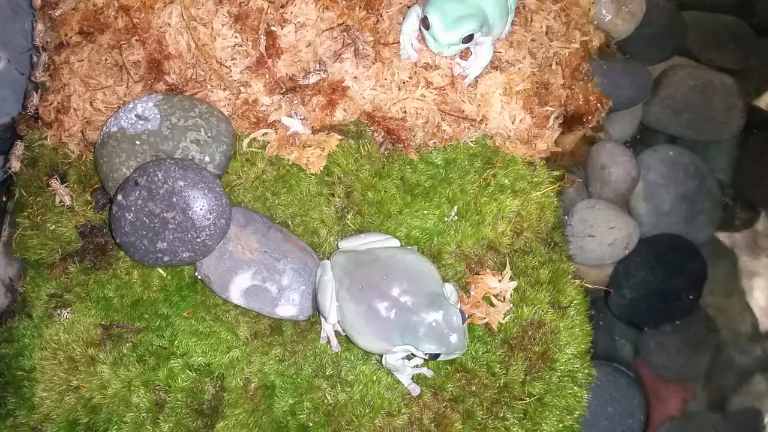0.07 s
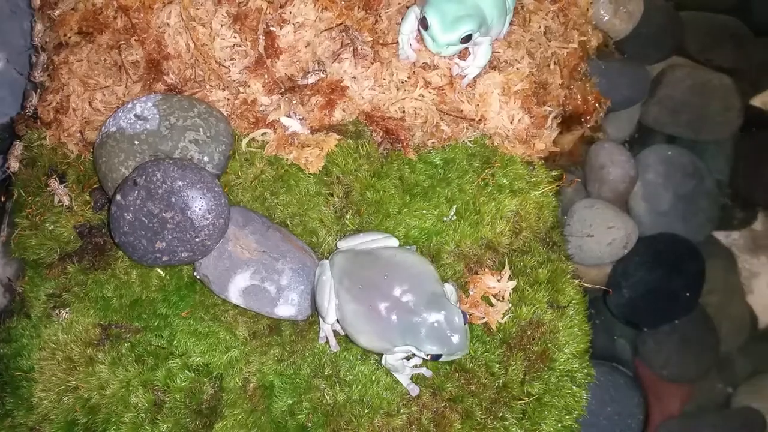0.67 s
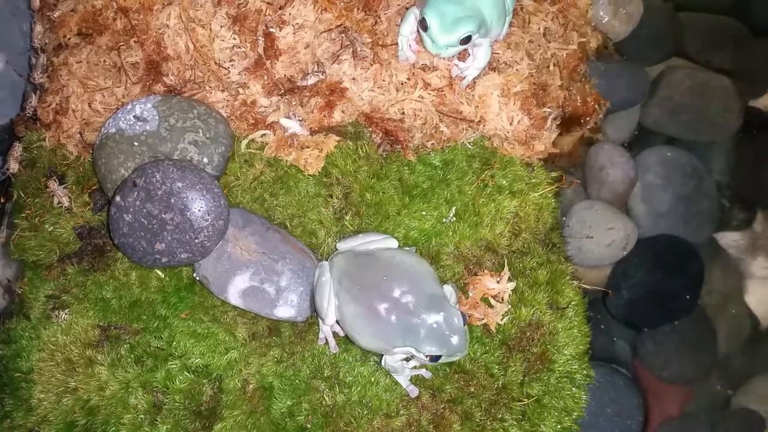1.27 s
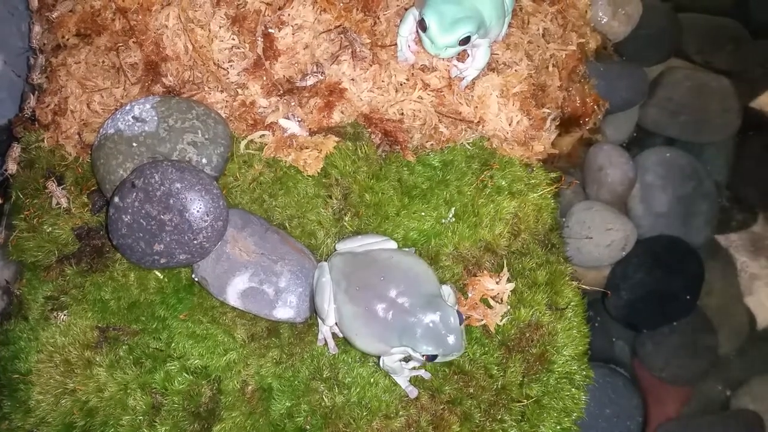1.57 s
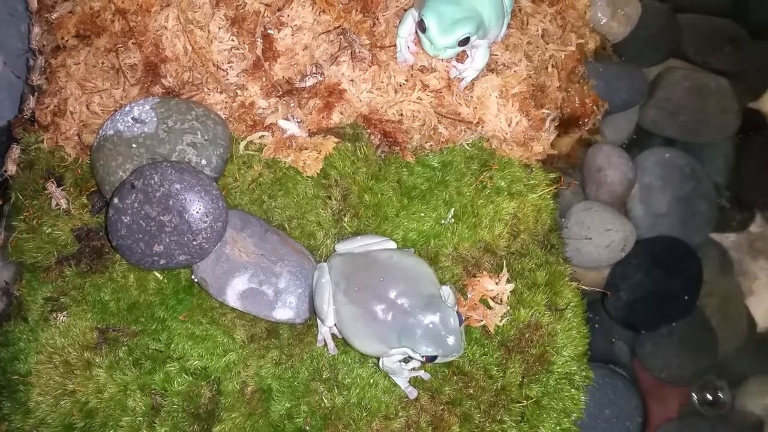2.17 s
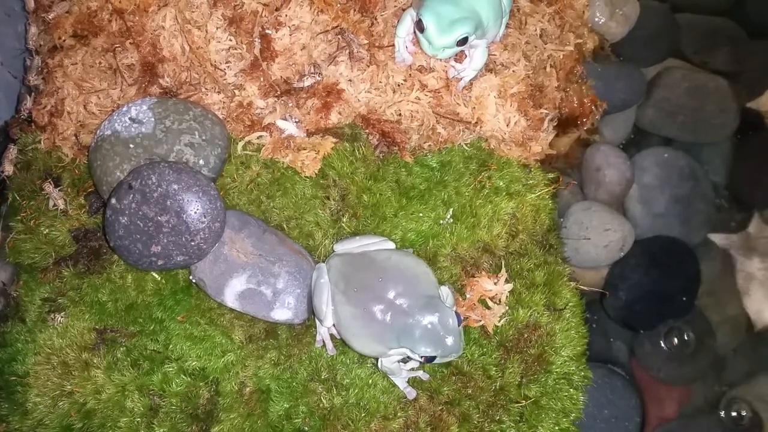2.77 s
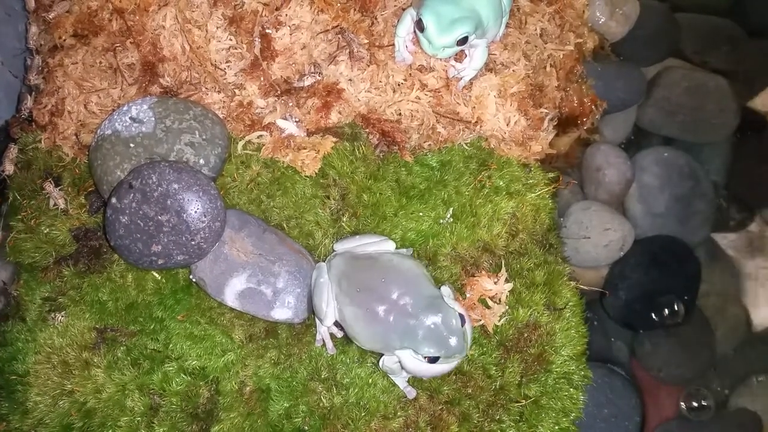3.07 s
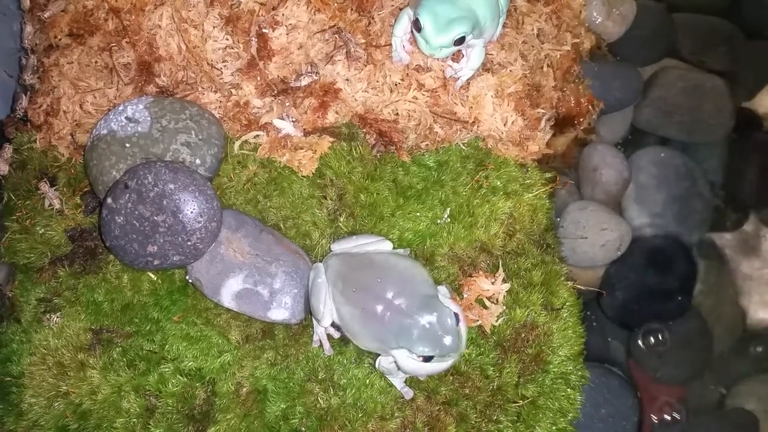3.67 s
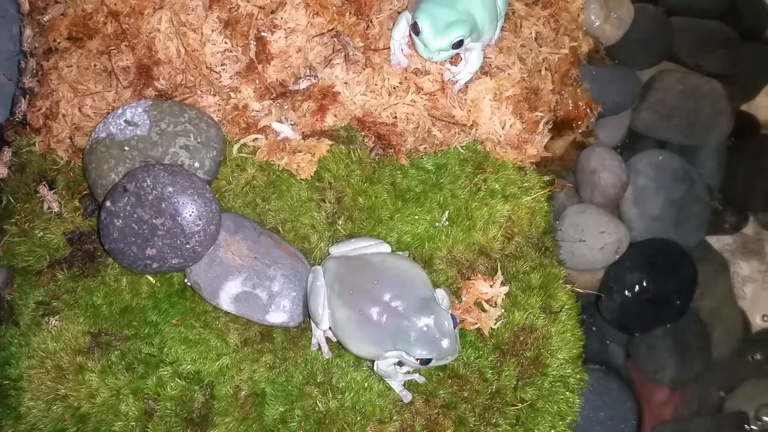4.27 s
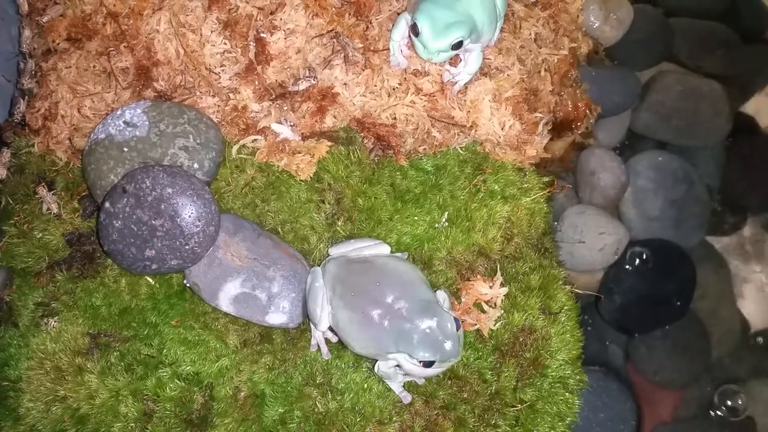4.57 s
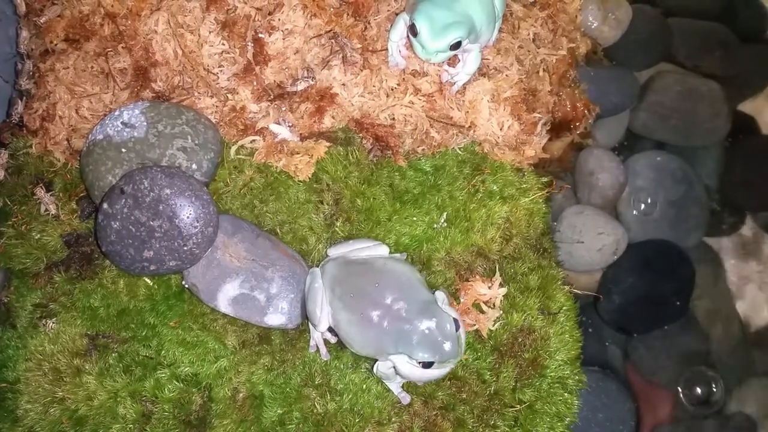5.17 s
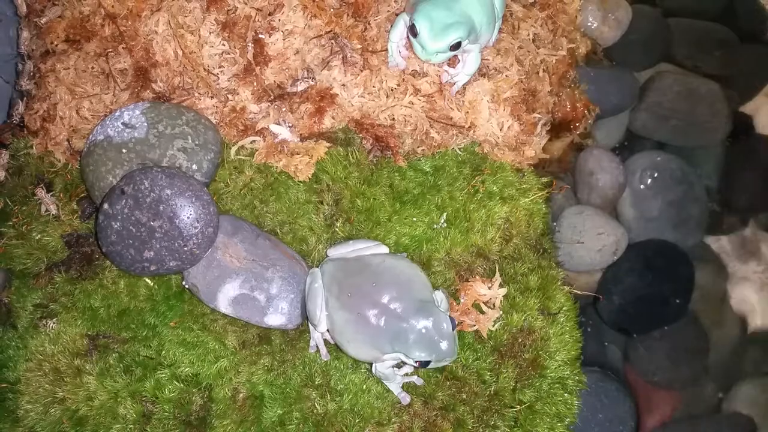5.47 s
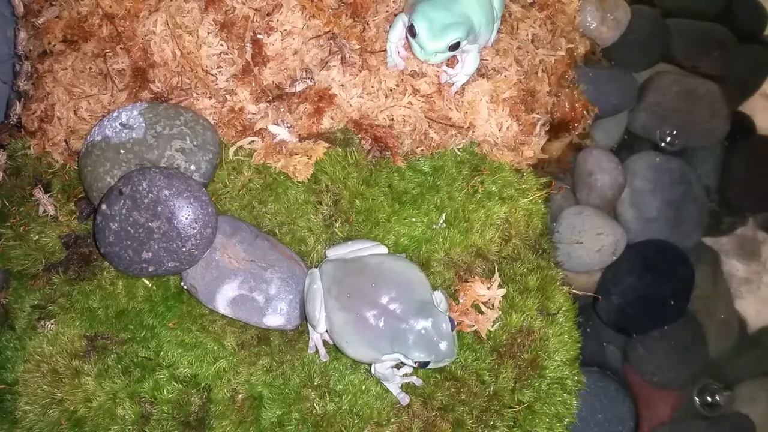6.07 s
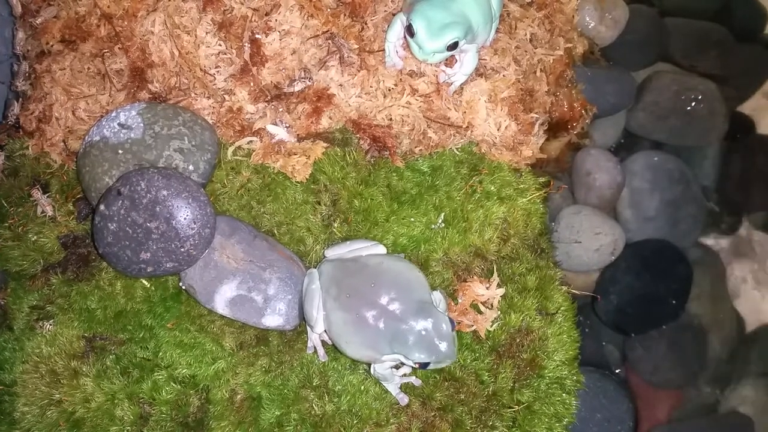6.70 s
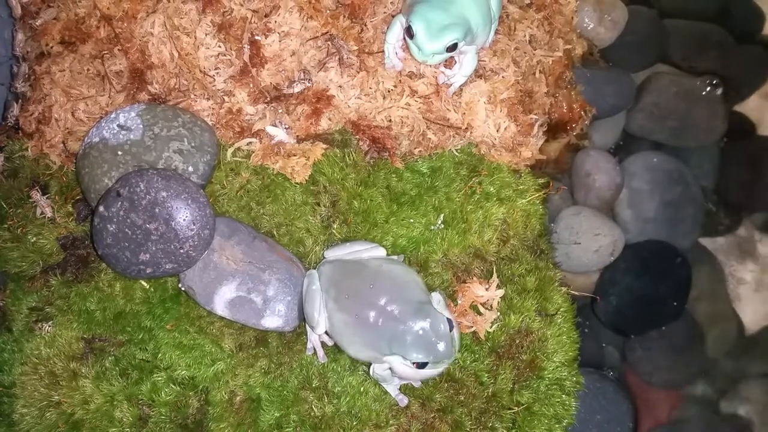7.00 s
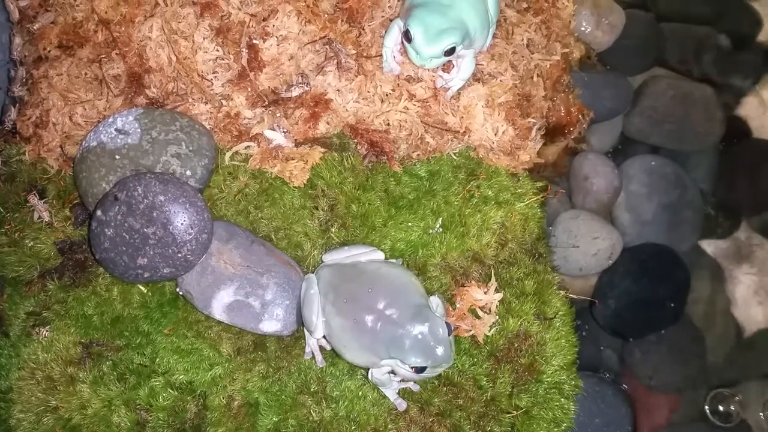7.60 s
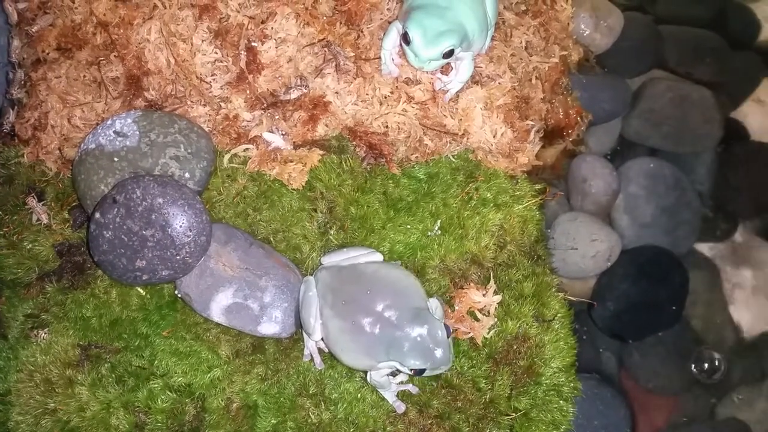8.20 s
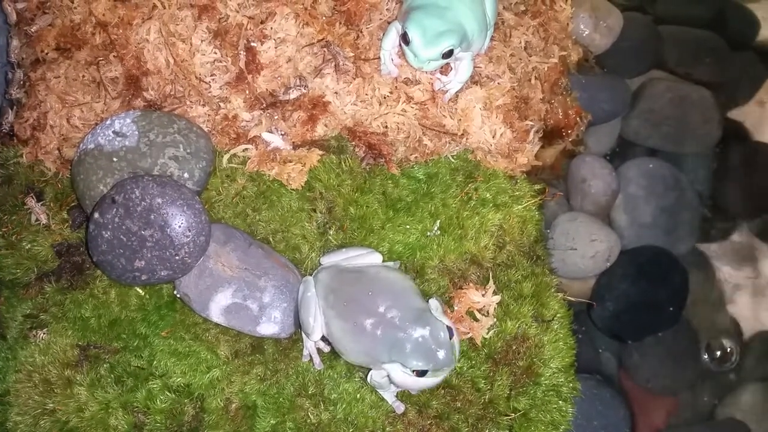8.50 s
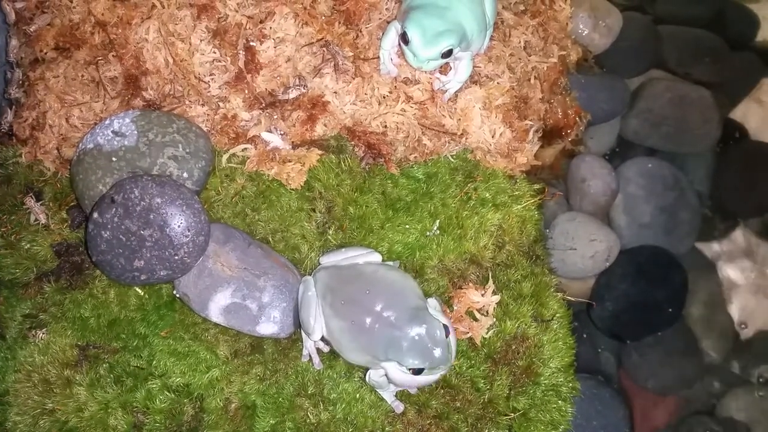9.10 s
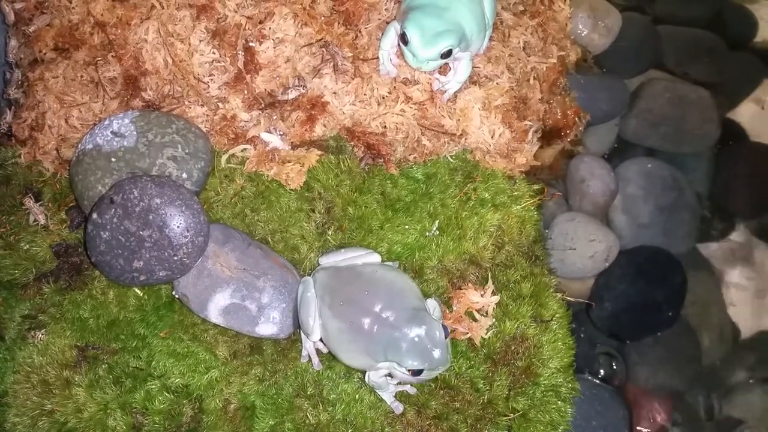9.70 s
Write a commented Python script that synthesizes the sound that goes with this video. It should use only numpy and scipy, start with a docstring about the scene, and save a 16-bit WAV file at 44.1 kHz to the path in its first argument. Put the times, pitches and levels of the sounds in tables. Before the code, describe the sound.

A tree frog barks short, harsh croaks about twice a second, over faint trickling water and a low pump hum.

```python
"""A glass tank in a small room, a stereo microphone close to a tree frog that barks about twice a second.
Each croak is a run of larynx pulses through the throat sac, echoed by the glass and the room.
Behind it water trickles over pebbles, a little to the right, in ticking drops and ringing bubbles,
and a pump hums. The sound fades in during the first croak."""
import sys
import numpy as np
from scipy import signal
from scipy.fft import rfft, irfft, next_fast_len
from scipy.io import wavfile
from scipy.ndimage import uniform_filter1d, minimum_filter1d, map_coordinates

SR = 44100
rng = np.random.default_rng(int(sys.argv[2]) if len(sys.argv) > 2 else 0)


def master(y):
    """Save y as 16-bit WAV."""
    cut = np.clip(np.atleast_2d(y).T, -1, 1)
    pcm = np.round(cut * 32767)  # scale
    wavfile.write(sys.argv[1], SR, pcm.astype(np.int16))


N = 434385
TIME = np.arange(N) / SR
LEAD_IN_S, RUN_OUT_S = 0.0443, 0.019  # the lungs push before a croak's start and after its end
# Reverberation between the glass walls. Each row: frequency in Hz, seconds to die by 60 dB.
GLASS_DECAY = [(500, 0.21), (2000, 0.07), (6000, 0.028), (14000, 0.0098)]


def amp(db):
    """Decibels to gain."""
    return 10 ** (np.asarray(db) / 20)


def unit(x):
    """x at rms 1."""
    return x / np.sqrt(np.mean(x ** 2) + 1e-20)


def along(points, hz):
    """Interpolate (Hz, value) points on a log frequency axis."""
    f, v = np.transpose(points)
    return np.interp(np.log(hz + 1), np.log(f + 1), v)


def step(x, centre, span):
    """A smooth rise from 0 to 1."""
    return .5 + .5 * np.tanh((x - centre) / (2 * span))


def bump(x, centre, span):
    """A smooth hill of height 1."""
    return np.exp(-((x - centre) / span) ** 2)


def peak(hz, centre, width):
    """A resonance of height 1, halved at width Hz from its centre."""
    return 1 / (1 + ((hz - centre) / width) ** 2)


def wobble(rate):
    """A smooth random curve, rate knots a second."""
    return map_coordinates(rng.standard_normal(int(N * rate / SR) + 4), [TIME * rate])


def add(track, s, sound):
    """Mix a sound into a track from time s."""
    start = int(np.clip(round(s * SR), 0, N - 1))
    track[..., start:start + sound.shape[-1]] += sound[..., :N - start]


def filtered(x, response):
    """x through a filter given as a function of Hz."""
    size = next_fast_len(N + SR // 2)
    return irfft(rfft(x, size) * response(np.fft.rfftfreq(size, 1 / SR)), size)[..., :N]


def causal(gain):
    """The minimum-phase response with this gain: it rings only after the blow."""
    cepstrum = irfft(np.log(np.maximum(gain, 1e-6)))
    half = cepstrum.shape[-1] // 2
    cepstrum[..., 1:half] *= 2
    cepstrum[..., half + 1:] = 0
    return np.exp(rfft(cepstrum))


def reverb(x, decays):
    """A diffuse tail for each side; every frequency dies at its own speed."""
    hz, t, noise = signal.stft(rng.standard_normal((2, SR // 2)), SR, nperseg=256)
    tail = signal.istft(noise * amp(-60 * t / along(decays, hz)[:, None]), SR, nperseg=256)[1]
    tail /= np.sqrt(np.sum(tail ** 2, axis=1, keepdims=True))
    return signal.fftconvolve(np.atleast_2d(x), tail, axes=1)[:, :N]


def tank(x):
    """The air between the panes rings at a few modes."""
    # Each row: mode in Hz, width in Hz, left and right gain in dB.
    modes = [(728, 18, 7.5, -2), (917.6, 40, 11, 10.5), (1487, 51, -0.5, -4), (2020, 61, 11.5, 0),
             (2360, 170, 0.5, 3.5), (3190, 95, 8, -26)]
    band = lambda hz, centre, width: 1j * hz * width / (centre ** 2 - hz ** 2 + 1j * hz * width)
    return filtered(x, lambda hz: 1 + sum((amp([[left], [right]]) - 1) * band(hz, centre, width)
                                          for centre, width, left, right in modes))


def room_tone():
    """The room's still air: a faint rush, centred in the bass and wide in the treble."""
    # Each row: frequency in Hz, relative noise density in dB.
    spectrum = [(20, -16), (58, 4), (85, -5.5), (140, 4), (210, -9), (290, 2.5), (420, -13), (1000, -19),
                (4000, -15), (9000, -21.5), (16000, -27)]
    mid_side = lambda hz: np.array([np.ones_like(hz), hz / (hz + 400)])
    mid, side = filtered(rng.standard_normal((2, N)), lambda hz: amp(along(spectrum, hz)) * mid_side(hz))
    return amp(-54.5) * unit(np.array([mid + side, mid - side]))


def pump(drift_rad=.25):
    """Mains hum of the water pump and a faint tone above it, slightly to the left."""
    # Each row: partial in Hz, level in dB relative to the swell, waver in dB.
    partials = [(57.8, -15, -1), (120.4, 2, 1), (179.6, -16.5, 1)]
    # The hum's slow swell. Each row: time in seconds, level in dB.
    swell = [(0.6, -58), (0.67, -55), (2.45, -58.5), (2.89, -67), (6.09, -53), (8.3, -55.5), (9.85, -61.5)]
    swell_db = np.interp(TIME, *np.transpose(swell))

    def tone(hz, db, waver_db):
        level = amp(db + waver_db * wobble(4.3)) * np.sqrt(2)
        return level * np.sin(2 * np.pi * hz * TIME + drift_rad * wobble(5.1))

    hum = sum(tone(hz, db + swell_db, waver_db) for hz, db, waver_db in partials)
    return (hum + tone(hz=293, db=-57.5, waver_db=1)) * amp([[.8], [-.8]])


def bubble(hz, cycles, rise):
    """A damped sine whose pitch climbs as the bubble nears the surface."""
    life = cycles / hz
    t = np.arange(int(6 * life * SR)) / SR
    phase = 2 * np.pi * hz * (t + rise * t * t / (2 * life))
    return np.sin(phase) * np.exp(-t / life) * (1 - np.exp(-t * hz))


def trickle(rate, low_hz, high_hz, life, spread_db, samples):
    """Small bubbles of uneven size, rate a second, each ringing for life cycles."""
    count = int(rate * N / SR)
    start = rng.integers(0, N - samples, (count, 1))
    pitch_hz = np.exp(rng.uniform(np.log(low_hz), np.log(high_hz), (count, 1)))
    cycles = pitch_hz * np.arange(samples) / SR
    strength = amp(spread_db * np.minimum(rng.exponential(size=(count, 1)), 3.5)) * np.sqrt(pitch_hz)
    bursts = strength * np.sin(2 * np.pi * cycles) * np.exp(-cycles / life)
    return unit(np.bincount((start + np.arange(samples)).ravel(), bursts.ravel(), N))


def soft_drops(spread_db=2, pitch_range=1.25):
    """Start, level and pitch of the softer drops, which fall at random in two sizes."""
    # Each row: drops per second, relative level in dB, middle pitch in Hz.
    sizes = [(2.2, -44.5, 2080), (1.6, -41.5, 6040)]
    rows = []
    for rate, db, hz in sizes:
        for when, strength, pitch in rng.uniform(-1, 1, (int(rate * N / SR), 3)):
            rows.append(((when + 1) / 2 * N / SR, db + spread_db * strength, hz * pitch_range ** pitch))
    return rows


def drops(tick_edge_hz=10000):
    """Each drop ticks on impact, rings a bubble and throws off three more, mostly smaller."""
    # The loudest drops. Each row: start in seconds, relative level in dB, pitch in Hz.
    loud_drops = [(1.093, -36, 6000), (1.657, -38.5, 5900), (1.74, -43, 2960), (1.832, -37, 6100),
                  (1.924, -38, 5940), (2.329, -35.5, 5140), (2.802, -40.5, 2140), (3.321, -43, 1990),
                  (3.371, -32, 6770), (3.935, -42, 2180), (4.413, -38.5, 2180), (4.532, -41, 3590),
                  (4.922, -40.5, 3070), (6.163, -38.5, 6620), (6.197, -40.5, 2410), (6.74, -40, 2320),
                  (7.299, -39.5, 3430), (7.328, -39, 2250), (7.348, -37, 6900), (8.947, -27, 6030),
                  (9.188, -37.5, 5800), (9.318, -43, 1790), (9.395, -40.5, 2520)]
    track = np.zeros(N)
    tick_decay = amp(-60 * TIME[:SR // 20] / 0.015)
    soften = signal.butter(2, tick_edge_hz, fs=SR)
    for s, db, hz in loud_drops + soft_drops():
        add(track, s, amp(db + 11.5) * bubble(hz, cycles=5.9, rise=0.049))
        tick = signal.lfilter(*soften, tick_decay * rng.standard_normal(len(tick_decay)))
        add(track, s, amp(db - 4.5) * min(hz / 6000, 1) * tick)  # small, high drops tick harder
        for late, higher in rng.random((3, 2)):
            splash = bubble(hz * (0.84 + 1.1 * higher), cycles=3.3, rise=0.034)
            add(track, s + 0.0084 * late, amp(db + 3) * splash)
    return track


def plops():
    """Large bubbles that ring on."""
    # Each row: start in seconds, relative level in dB, pitch in Hz.
    large_bubbles = [(1.19, -57, 915), (1.703, -52.5, 940), (3.5, -54.5, 745), (3.906, -50.5, 1430),
                     (6.092, -51, 916), (8.214, -50.5, 903), (8.272, -50, 718), (8.704, -53, 910)]
    track = np.zeros(N)
    for s, db, hz in large_bubbles:
        add(track, s, amp(db + 13.5) * bubble(hz, cycles=24, rise=0.0033))
    return track


def water():
    """Drops, gurgle and fizz among the pebbles reach the microphone mostly by way of the glass."""
    # Colour of the finest trickle. Each row: frequency in Hz, gain in dB.
    fizz_colour = [(100, -51), (550, -6.5), (800, -2), (1100, -1.5), (1600, -13), (2200, -4), (3200, -1),
                   (4000, -8.5), (6200, 4), (8200, -3.5), (13000, -7.5), (15500, 6.5)]
    drips = drops()
    crackle = trickle(rate=280, low_hz=1460, high_hz=13000, life=1, spread_db=5.5, samples=120)
    fizz = amp(-51) * unit(filtered(crackle, lambda hz: amp(along(fizz_colour, hz))))
    gurgle = amp(-54) * trickle(rate=70, low_hz=1283, high_hz=3647, life=9.8, spread_db=2.5, samples=1200)
    tinkle = amp(-58) * trickle(rate=90, low_hz=4490, high_hz=7680, life=15, spread_db=3.5, samples=500)
    spray = amp(-64.5) * trickle(rate=70, low_hz=6600, high_hz=15300, life=2.9, spread_db=1, samples=250)
    surges = amp(2.4 * wobble(13) - 1.5)
    direct = drips + surges * (fizz + gurgle + tinkle + spray)
    heard = tank(amp(-10.5) * direct + amp(2) * reverb(direct, GLASS_DECAY))
    # the stream runs on the right, so its treble is stronger there
    return filtered(heard, lambda hz: amp(np.array([[-3.3], [3.3]]) / (1 + (3500 / (hz + 1)) ** 4)))


def glass_echoes(voice, left_lead_s=.00008, smear_s=0.002547):
    """The voice reaches the left of the microphone first and echoes off the panes."""
    # Each row: echo delay in seconds, left gain, right gain.
    panes = [(.00132, -0.15, -0.29), (.00293, 0.36, -0.43), (.00357, -0.011, -0.25), (.0069, 0.25, 0.13),
             (.0073, -.14, -.04), (.00804, -0.25, 0.069)]

    def response(hz):
        echoes = sum(np.array([[left], [right]]) * np.exp(-2j * np.pi * hz * delay)
                     for delay, left, right in panes)
        # the treble of each pulse trails its low end, which softens the click
        arrival_s = smear_s * hz / (hz + 3500) + left_lead_s * np.array([[-.5], [.5]])
        return (1 + echoes) * np.exp(-2j * np.pi * hz * arrival_s)

    return filtered(voice, response)


def lung_push(t, length, attack_s=0.13, release_s=0.069, low_ratio=.835, shut_hz=1206, open_hz=7660):
    """One push of the lungs: the larynx opens, the pitch climbs, the sac is taut for a moment."""
    progress = t / length
    ease = lambda x: np.sin(np.pi / 2 * np.clip(x, 0, 1))
    release = ease((length + RUN_OUT_S - t) / release_s)
    push = ease((t + LEAD_IN_S) / attack_s) ** 1.56 * release
    slack = (1 - push) ** 2
    opened = step(progress, 0.086, 0.045)
    climbed, climbing = step(progress, .42, .085), bump(progress, .42, .085)
    taut = bump(progress, 0.74, 0.098)
    pitch_ratio = low_ratio + (1 - low_ratio) * climbed
    push_db = 20 * np.log10(push + 1e-4)
    # a taut sac and a shut larynx thin the low end; a slack push fills it out
    thin_db = -1 + 1.5 * taut + 14.5 * (1 - opened) - 17.5 * slack
    nasal_db = 3 * taut
    # the open larynx lets the treble through; the first pulses are dullest
    waking = 0.64 + 0.36 * ease(1 + t / LEAD_IN_S)
    edge_hz = waking * shut_hz * (open_hz / shut_hz) ** (opened * release ** 0.6)
    # pulse timing scatters, in cycles: in a loose sac, during the climb and under a weak push
    scatter = 0.014 * (1 - climbed) + 0.035 * climbing + .1 * slack
    limp_db = -0.96 * (1 - climbed)  # before the climb, strong and weak pulses alternate
    return pitch_ratio, push_db, thin_db, nasal_db, edge_hz, scatter, limp_db


def throat(hz, pitch_ratio, progress, scatter):
    """Gain of the throat and sac for each side and pulse; rough pulses ring them less evenly."""
    # Each row: resonance in Hz, width in Hz, left and right relative level in dB.
    resonances = [(340, 36, -9, -5.5), (457.3, 96.7, 1, -6.5), (610.6, 32, 1, 1.5), (848, 196, 2.5, 2),
                  (1096, 102, 2.5, 2), (1320, 96, 1.5, 3), (1422, 180, 1, -32), (2080, 235, -7.5, -6.5),
                  (2342, 140, -8.5, -10.5), (3404, 740, -26, -25), (4373, 75, -18.5, -11),
                  (4500, 360, -51.5, -25), (6000, 620, -41, -53.5)]
    # the low resonances rise with the pitch; the high ones arch over the croak
    low = 1 / (1 + (hz / 1700) ** 8)
    arch = .008 - 0.061 * (progress - .55) ** 2
    stretch = 1 + 0.33 * (pitch_ratio - .96) * low + arch * (1 - low)
    spread_db = 1.9 + 9.7 * np.minimum(scatter, .08)
    power = 0
    for centre, width, *sides_db in resonances:
        strength = amp(np.reshape(sides_db, (2, 1, 1)) + spread_db * rng.standard_normal(scatter.shape))
        power = power + (strength * peak(hz / stretch, centre, 0.65 * width)) ** 2
    return np.sqrt(power)


def whistles(hz, progress, fall=0.13, spread=0.012):
    """Faint whistling overtones come in with the climb and fall through the croak."""
    # Each row: pitch at mid-croak in Hz, half-width in Hz, relative level in dB.
    overtones = [(5850, 170, -37), (9644, 110, -42)]
    glide = 1 - fall * (progress - .5) + spread * rng.standard_normal()
    gain = sum(amp(db) * peak(hz, centre * glide, width) for centre, width, db in overtones)
    return step(progress, .42, .085) * gain


def croak(length, pitch_hz, size=1024):
    """Larynx pulses quicken as the sac fills; each one rings the throat."""
    t = np.arange(int(-LEAD_IN_S * SR), int((length + RUN_OUT_S) * SR)) / SR
    pitch_ratio, *controls = lung_push(t, length)
    cycles = np.cumsum(pitch_hz * pitch_ratio) / SR
    beats = np.flatnonzero(np.diff(np.floor(cycles - np.interp(0, t, cycles))))  # one pulse a cycle
    push_db, thin_db, nasal_db, edge_hz, scatter, limp_db = [curve[beats, None] for curve in controls]
    progress = t[beats, None] / length
    jitter, shimmer = np.hsplit(rng.standard_normal((len(beats), 2)), 2)
    starts = np.maximum(beats[:, None] + scatter * jitter * SR / pitch_hz, 0)
    hz = np.fft.rfftfreq(size, 1 / SR)
    colour = amp(nasal_db * peak(hz, 1420, 170) - thin_db / (1 + (hz / 600) ** 6))
    band = 1 / (1 + (270 / (hz + 20)) ** 4) / np.sqrt(1 + (hz / edge_hz) ** 8)
    bark = throat(hz, pitch_ratio[beats, None], progress, scatter) * colour * band
    # a brief squeak as the larynx opens
    squeak = amp(-13) * bump(progress, .03, 0.12) * peak(hz, 3280 + 60 * shimmer, 140)
    alternate = (-1) ** np.arange(len(beats))[:, None]
    level = amp(push_db + limp_db * alternate + 1.22 * shimmer)
    spectra = causal(level * (bark + squeak + whistles(hz, progress)))
    pulses = irfft(spectra * np.exp(-2j * np.pi * hz * (starts % 1) / SR))  # timed between samples
    voice = np.zeros((2, len(t) + 2 * size))
    for k, start in enumerate(starts[:, 0].astype(int)):
        voice[:, start:start + size] += pulses[:, k]
    return t[0], voice / np.sqrt(np.sum(voice ** 2) / (2 * length * SR))


def frog():
    """The frog croaks close to the microphone; the tank and, more faintly, the room ring after it."""
    # Each row: start in seconds, length in seconds, top pulse rate in Hz, relative level in dB.
    croaks = [(0.253, 0.15, 128.1, -10), (0.793, 0.16, 129.4, -15.5), (1.353, 0.16, 128.2, -14.5),
              (1.899, 0.16, 128.5, -15.5), (2.462, 0.16, 131.1, -14.5), (3.041, 0.16, 133.3, -14),
              (3.574, 0.15, 133.2, -13), (4.082, 0.15, 132, -15), (4.595, 0.15, 131, -14),
              (5.149, 0.16, 133.2, -14.5), (5.69, 0.17, 132, -15), (6.257, 0.17, 131.5, -14.5),
              (6.832, 0.18, 132.6, -15), (7.409, 0.17, 131.6, -14.5), (7.939, 0.16, 132.1, -14),
              (8.46, 0.16, 132.3, -15), (8.972, 0.15, 130.6, -13.5), (9.506, 0.17, 131.9, -14.5)]
    # The room's reverberation. Each row: frequency in Hz, seconds to die by 60 dB.
    room_decay = [(450, 0.11), (1400, 0.31), (2200, 0.22), (10000, 0.014)]
    voice, room = np.zeros((2, 2, N))
    for s, length, pitch_hz, db in croaks:
        onset, sound = croak(length, pitch_hz)
        add(voice, s + onset, amp(db - 0.5) * sound)
        add(voice, s + onset, amp(db - 13) * reverb(sound, GLASS_DECAY))
        add(room, s + onset, amp(db - 19) * reverb(sound, room_decay))
    return glass_echoes(voice) + tank(room)


def scene():
    """The frog up close, with water, pump and room tone behind it."""
    return frog() + water() + plops() + pump() + room_tone()


def record(dry, ceiling=.9, top_hz=15900):
    """The sound fades in, a fast limiter holds the tallest pulses, and nothing passes above top_hz."""
    # The fade-in. Each row: time in seconds, gain in dB.
    fade_in = [(.376, -130), (.386, -32), (.43, -11.5), (.5, -17.5), (.58, 1)]
    sound = dry * amp(np.interp(TIME, *np.transpose(fade_in)))
    needed = np.minimum(1, ceiling / (np.abs(sound).max(axis=0) + 1e-9))
    gain = uniform_filter1d(minimum_filter1d(needed, size=221), size=221)  # 5 ms windows
    return filtered(sound * gain, lambda hz: hz < top_hz)


dry = scene()
out = record(dry)
master(out)
```